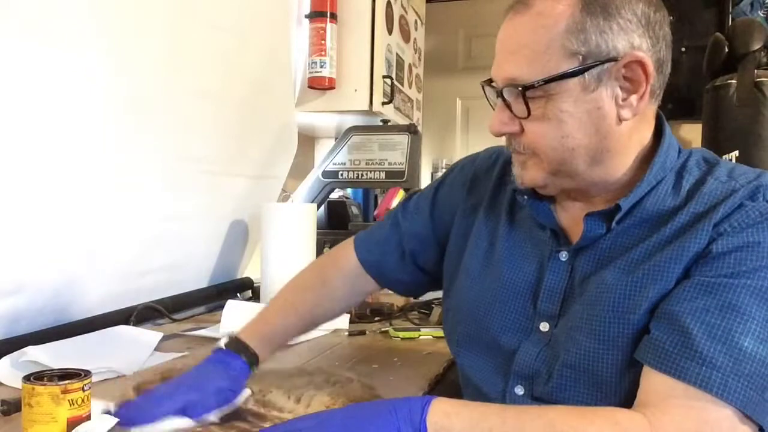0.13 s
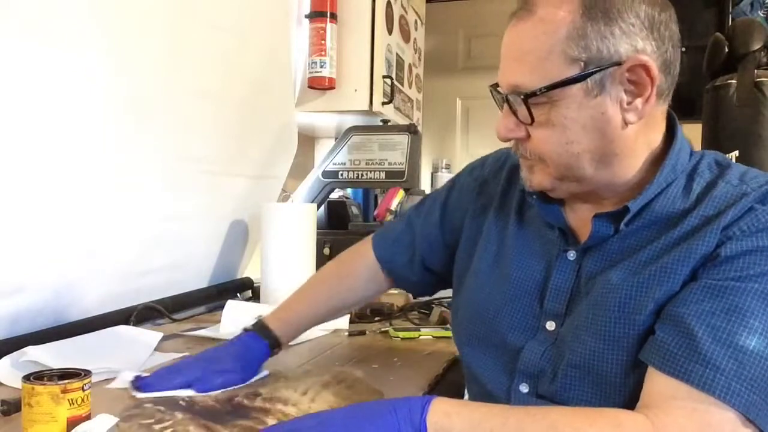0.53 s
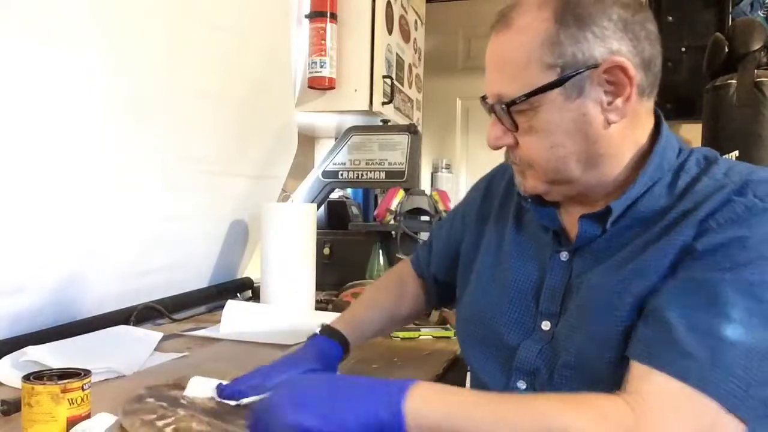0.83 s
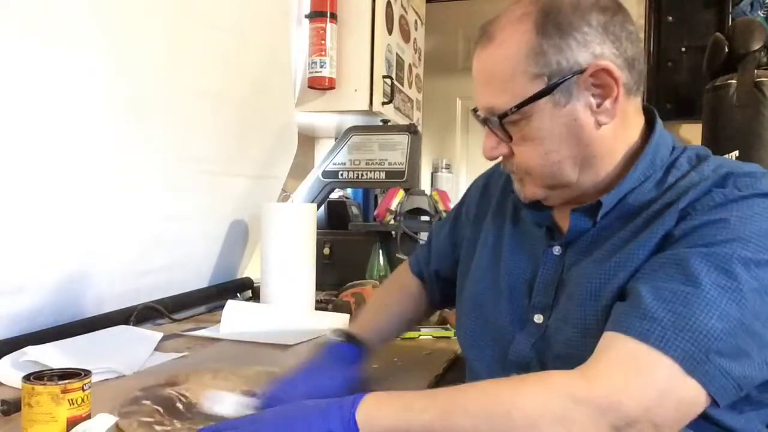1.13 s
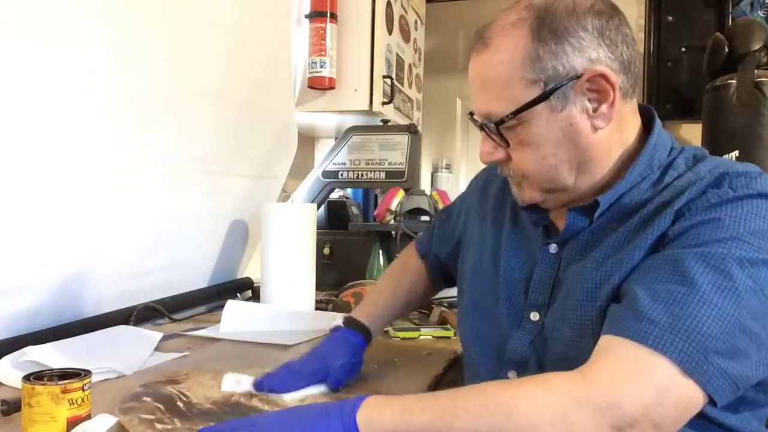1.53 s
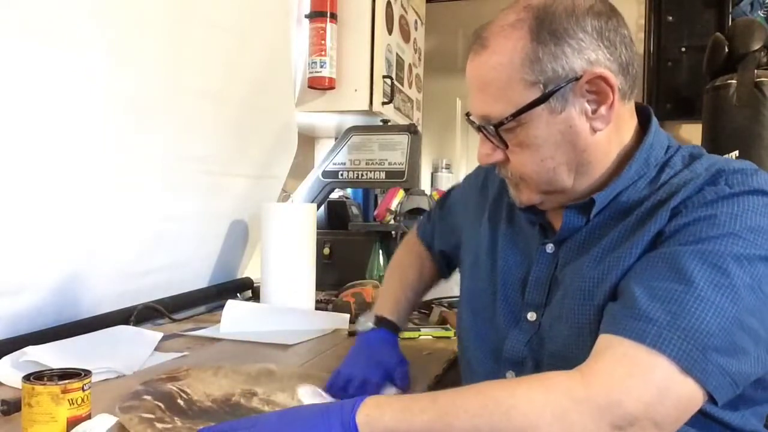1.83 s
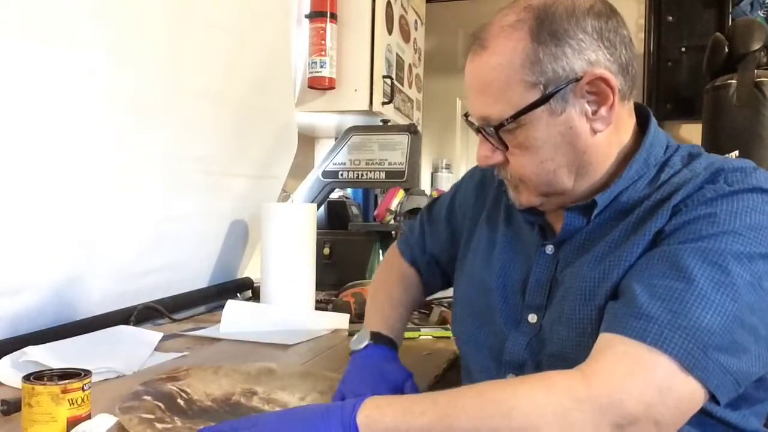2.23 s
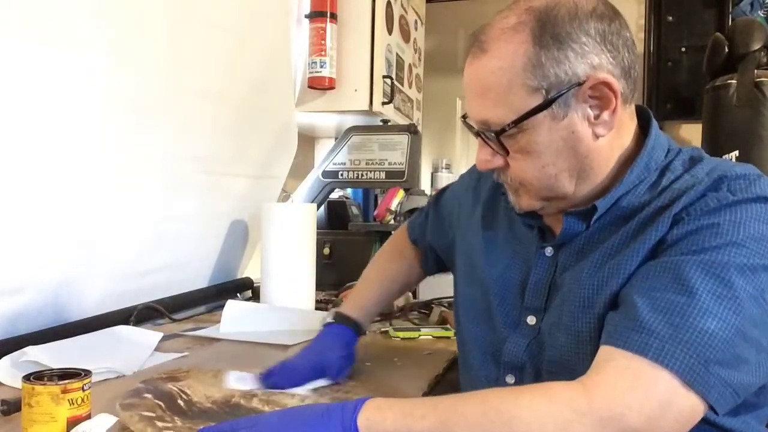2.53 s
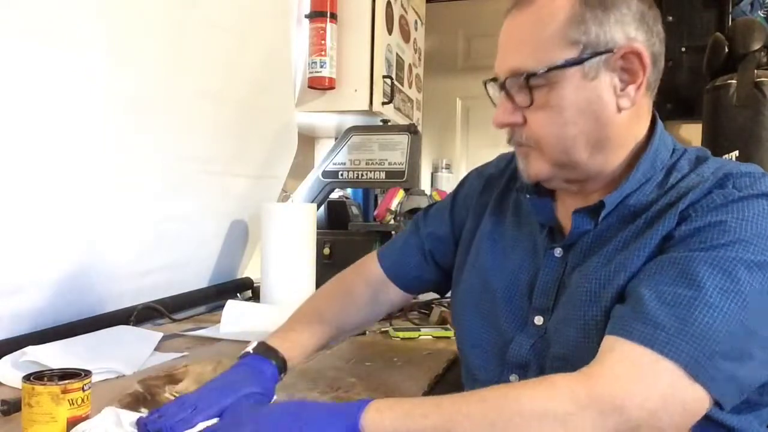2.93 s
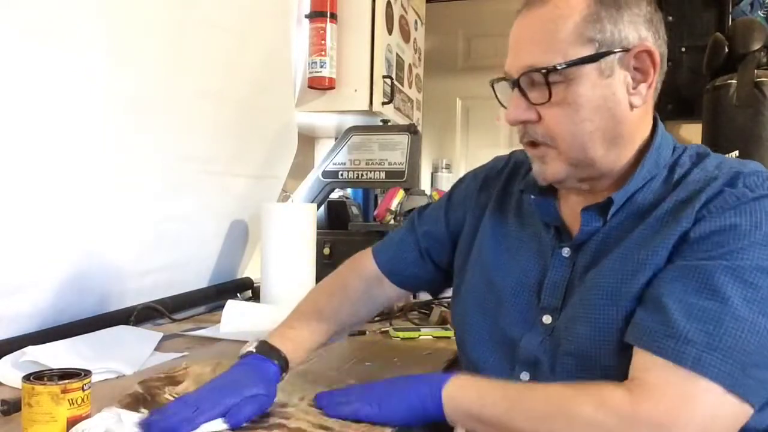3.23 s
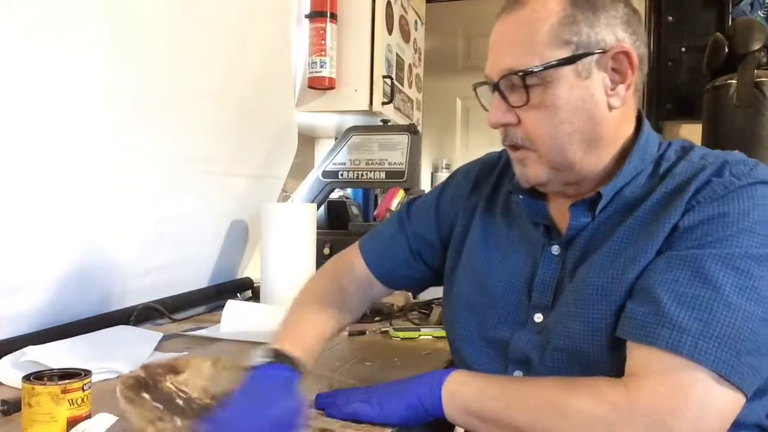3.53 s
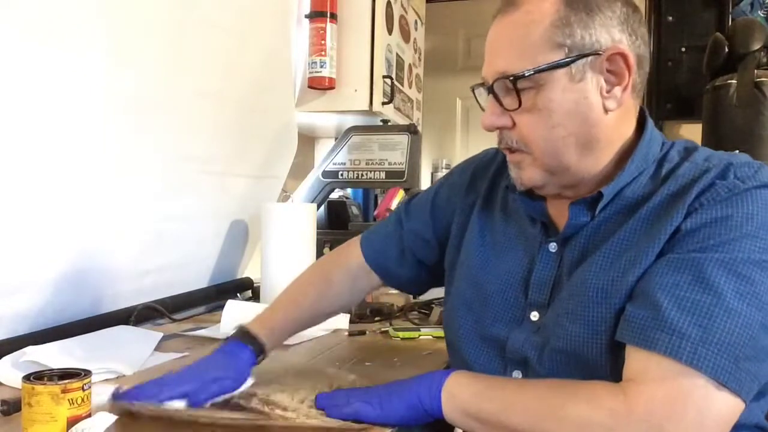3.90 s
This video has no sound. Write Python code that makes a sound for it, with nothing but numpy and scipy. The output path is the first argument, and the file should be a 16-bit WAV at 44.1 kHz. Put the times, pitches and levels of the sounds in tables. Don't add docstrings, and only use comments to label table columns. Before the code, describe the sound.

Dry papery wiping hisses over a dull drum-like skin, briefly humming, pausing and resuming, then crunching in a cluster of sharp snaps.

```python
import sys
import numpy as np
from scipy import signal
from scipy.fft import rfft, irfft
from scipy.io import wavfile

SR = 44100
rng = np.random.default_rng(int(sys.argv[2]) if len(sys.argv) > 2 else 0)


def transcribe(u):
    v = np.clip(np.atleast_2d(u).T, -1, 1)
    q = np.round(v * 32767).astype(np.int16)
    wavfile.write(sys.argv[1], SR, q)


def natural_amplitude(level_db):
    exponent = np.asarray(level_db, float) / 20
    return 10 ** exponent


N = 179134

# frequency in Hz, bandwidth in Hz, level in dB.
SKIN_MODES = [(210, 34, -7.5), (303, 320, -1.5), (474.5, 51, 3), (595, 240, 0.5), (677, 22, 1.5),
              (850, 130, -24)]


def evened(x):
    return x / np.sqrt(np.mean(x ** 2) + 1e-20)


def filtered(x, points):
    f, db = np.transpose(points)
    hz = np.fft.rfftfreq(x.shape[-1], 1 / SR)
    gain_db = np.interp(np.log(hz + 1), np.log(f), db, left=-80)
    return irfft(rfft(x) * natural_amplitude(gain_db), x.shape[-1])


def coloured(x, points):
    return evened(filtered(x, points))


def resonate(x, hz, width):
    r = np.exp(-np.pi * width / SR)
    return signal.lfilter([1 - r, 0, r - 1], [1, -2 * r * np.cos(2 * np.pi * hz / SR), r * r], x)


def skin(x, modes):
    return sum(natural_amplitude(db) * resonate(x, hz, width) for hz, width, db in modes)


def drift(hz):
    return evened(signal.lfilter(*signal.butter(2, hz, fs=SR), rng.standard_normal(N)))


def add(mix, s, sound):
    part = mix[round(s * SR):][:len(sound)]
    part += sound[:len(part)]


def slips(spread_db, judder_db):
    slips_per_s = 10000
    size = natural_amplitude(spread_db * np.minimum(rng.exponential(1, N), 6)) * rng.standard_normal(N)
    clicks = evened(size * (rng.random(N) < slips_per_s / SR))
    return (0.5 * clicks + rng.standard_normal(N)) * natural_amplitude(judder_db)


def shed():
    # frequency in Hz, level in dB.
    hum_curve = [(12, -19), (22, 6.5), (35, -0.5), (60, -8), (85, -9.5), (200, -13.5), (300, -13),
                 (600, -35)]
    # time in seconds, level in dB.
    leans = [
        (0.27, -70),
        (0.95, -59),
        (1.65, -86),
        (2.16, -86),
        (2.35, -84),
        (3.15, -57.5),
        (3.33, -62),
    ]
    lean_s = 0.036
    t = np.arange(N) / SR
    leaning = sum(natural_amplitude(db) * np.exp(-((t - s) / lean_s) ** 2) for s, db in leans)
    rumble = natural_amplitude(-70 + 2.5 * drift(2))
    return (rumble + leaning) * coloured(rng.standard_normal(N), hum_curve)


def bumps():
    # time in seconds, peak in dB, frequency in Hz.
    landings = [
        (0.272, -56, 132),
        (0.588, -58, 202),
        (0.934, -43, 192),
        (0.935, -46, 425),
        (2.018, -55, 205),
        (3.121, -49, 230),
        (3.124, -49, 420),
        (3.563, -53, 183),
        (3.98, -50, 230),
        (3.989, -45, 520),
    ]
    out, t = np.zeros(N), np.arange(6000) / SR
    for s, db, hz in landings:
        envelope = natural_amplitude(db - 60 * t / 0.082) * (1 - np.exp(-t / 0.0029))
        add(out, s, envelope * np.sin(2 * np.pi * hz * t))
    return out


def singing():
    from_s, to_s, edge_s, tightest_s = 0.012, 0.824, 0.05, 0.47
    top_hz, sag_hz_per_s, waver_hz, flutter_hz = 708, 110, 14.4, 58
    level_db, fade_db_per_s, beads_db = -61.5, 7, 4
    t = np.arange(N) / SR
    free = np.clip(np.minimum(t - from_s, to_s - t) / edge_s, 0, 1)
    slack_s = abs(t - tightest_s)
    pitch = top_hz - sag_hz_per_s * slack_s + waver_hz * drift(14.4)
    turn = np.exp(2j * np.pi * np.cumsum(pitch) / SR)
    drive = slips(spread_db=9.0, judder_db=1.5 * drift(38))
    flutter = signal.lfilter(*signal.butter(2, flutter_hz, fs=SR), drive / turn)
    ring = 0.98 + flutter / np.std(flutter)
    level = natural_amplitude(level_db - fade_db_per_s * slack_s + beads_db * drift(37))
    return free * level * evened((ring * turn).real)


def snap(peak_db, hz, low_db, noise):
    t = np.arange(len(noise)) / SR
    low_hz = 0.37 * hz
    crumple = noise * np.exp(-t / 0.0019) * (1 - np.exp(-t / 0.000072))
    burst = crumple - 4.9 * signal.unit_impulse(len(t))
    burst = signal.lfilter(*signal.butter(2, [300, 11000], "band", fs=SR), burst)
    tick = resonate(burst, 6.7 * hz, 3.3 * hz) * np.exp(-t / 0.0021)
    high = resonate(resonate(burst, hz, 0.6 * hz), hz, 0.85 * hz)
    low = resonate(burst, low_hz, 1.08 * low_hz)
    parts = [tick, high, low, skin(burst, SKIN_MODES)]
    tick, high, low, thud = (p / abs(p).max() for p in parts)
    return natural_amplitude(peak_db) * (0.29 * tick + high + natural_amplitude(low_db + 3.0) * (low + 0.38 * thud))


def creases():
    # time in seconds, peak in dB, pitch in Hz, share of the lower fold in dB.
    snap_events = [(0.151, -30, 3000, -9.5), (0.229, -32, 3800, -4), (0.27, -41, 2000, 1),
                   (0.315, -30.5, 2580, -18), (0.448, -38, 3100, 0), (0.588, -32, 1900, -9),
                   (0.927, -38.5, 3970, -1), (0.932, -32, 4100, -5), (0.9345, -23, 3800, -4.5),
                   (0.939, -27, 3200, -13), (0.946, -28, 2100, -16), (1.354, -32, 4600, -8),
                   (1.538, -35, 3800, -6), (2.018, -32.5, 4900, -8), (2.625, -33.5, 4650, -4.5),
                   (2.714, -33.5, 2750, -4.5), (2.724, -30.5, 2960, -5), (2.853, -26.5, 2610, -8.5),
                   (2.952, -44.5, 2270, 2), (3.122, -46.5, 3660, 5), (3.228, -37, 2860, -4),
                   (3.578, -37, 1650, -5), (3.686, -29, 4500, -15), (3.7463, -23, 3400, -19),
                   (3.774, -28, 2300, -10), (3.9925, -24.5, 1350, -15), (3.9778, -20.5, 3760, -21),
                   (3.9895, -29, 2000, 0.5), (4.013, -25, 1800, -44), (4.03, -25, 3380, -12)]
    out, noise = np.zeros(N), rng.standard_normal((len(snap_events), 3000))
    for (s, *how), row in zip(snap_events, noise):
        add(out, s, snap(*how, row))
    t = np.arange(8000) / SR
    room = rng.standard_normal(8000) * natural_amplitude(-60 * t / 0.31) * (1 - np.exp(-t / 0.0013))
    room = natural_amplitude(-7) * room / np.linalg.norm(room)
    room[round(0.011 * SR)] += 0.3
    return out + signal.oaconvolve(out, room)[:N]


def reversals(t):
    # time in seconds, loss of speed in dB, time to pick up in seconds.
    hand_turns = [
        (1.4, -4.5, 0.42),
        (1.63, -2.5, 0.053),
        (1.873, -7.5, 0.073),
        (2.123, -8, 0.11),
        (3.346, -8, 0.039),
    ]
    brake_s = 0.018
    return sum(db * np.exp(np.where(t < s, (t - s) / brake_s, (s - t) / pick_up))
               for s, db, pick_up in hand_turns)


def crumples(t):
    # start in seconds, dying time in seconds, strength in dB, weight on the skin in dB,
    # skin ring in dB.
    crush_events = [(0.0, 0.074, -63, 2.5, 4.5), (0.255, 0.011, -55, 10, -16),
                    (0.432, 0.027, -60, 11.5, -11), (0.91, .03, -57.5, 0, -6.0),
                    (0.924, 0.039, -48, 4.5, -6.5), (1.148, 0.034, -58, 8.5, -16),
                    (2.708, 0.026, -50, 2.5, -1.5), (2.745, 0.084, -60, -10.5, 8),
                    (3.102, 0.033, -65.5, 0, -6.0), (3.118, 0.022, -51.5, 0.5, 2.5),
                    (3.58, 0.028, -60, 5, 1), (3.673, 0.033, -46.5, -2.5, -3.5),
                    (3.743, 0.016, -41, -3, -9.0), (3.935, 0.092, -46, -2.5, -10.5),
                    (3.987, 0.074, -42.5, -1.5, -19)]
    rise_s = 0.0055
    crush, weight, thud = np.zeros((3, N))
    for s, dying, db, weight_db, ring_db in crush_events:
        late = np.maximum(t - s, 0)
        shape = natural_amplitude(db) * (1 - np.exp(-late / rise_s)) * np.exp(-late / dying) * 2
        crush = np.hypot(crush, shape)
        weight = np.hypot(weight, natural_amplitude(weight_db) * shape)
        thud = np.hypot(thud, natural_amplitude(weight_db + ring_db) * shape)
    return crush, weight, thud


def rub():
    # time in seconds, sliding strength in dB, bunching of the towel from 0 to 1.
    hand_path = [(0.0, -44, 0.09), (0.21, -46.5, 0), (0.3, -50.5, 0.69), (0.52, -52.5, 0.31),
                 (0.56, -49, 0.2), (0.68, -52, 0.65), (0.74, -59, 0.68), (0.908, -63.5, 0.72),
                 (1.01, -49, 0.19), (1.83, -44, 0), (2.45, -47, 0.08), (2.82, -49, .05), (2.93, -61, .9),
                 (3.1, -77, 0.94), (3.18, -47.5, 0.16), (3.6, -47.5, 0), (3.9, -45, 0.3),
                 (4.06, -46.5, 0.6)]
    # frequency in Hz, level in dB.
    fibre_curve = [(1500, -37), (2800, -6), (3800, -1.5), (4800, -1), (6000, -6), (7500, -15.5),
                   (10000, -39.5)]
    sheen_curve = [(5500, -5.5), (7500, -3.5), (10000, -2.5), (13000, -9), (15800, -6)]
    drag_curve = [(500, -48), (900, -4.5), (1300, -4), (2000, -3), (2800, -1.5), (4500, -24)]
    # frequency in Hz, bandwidth in Hz, level in dB.
    upper_modes = [(1084, 52, -4.5), (1200, 40, -5), (1380, 21, -6), (1547, 21, 3), (1775, 81, -2),
                   (1991, 17, 9), (2095, 45, -4), (2205, 65, 5.5)]
    t = np.arange(N) / SR
    s, db, bunch = np.transpose(hand_path)
    slide_db = np.interp(t, s, db)
    bunch = np.clip(np.interp(t, s, bunch), 0, 1)
    turn_db = reversals(t)
    crush, weight, thud = crumples(t)
    hiss = np.hypot(natural_amplitude(slide_db + turn_db), crush)
    sheen = np.hypot(natural_amplitude(slide_db + 1.44 * turn_db - 3.5 - 13.5 * bunch), natural_amplitude(-36) * crush)
    drag = np.hypot(natural_amplitude(slide_db + 0.7 * turn_db - 8 + 9.5 * bunch), weight)
    ring = np.hypot(natural_amplitude(slide_db + turn_db - 15.5 + 14 * bunch), thud)
    judder = drift(11.3)
    fine = slips(spread_db=-9.0, judder_db=0.5 * judder + 0.074 * drift(100))
    coarse = slips(spread_db=4.5, judder_db=1.74 * judder + 0.27 * drift(79))
    paper = hiss * coloured(fine, fibre_curve) + sheen * coloured(fine, sheen_curve)
    body = evened(coloured(coarse, drag_curve) + 0.19 * evened(skin(coarse, upper_modes)))
    return paper + drag * body + ring * evened(skin(coarse, SKIN_MODES))


def scene():
    return np.tile(shed() + bumps() + singing() + creases() + rub(), (2, 1))


def microphone(dry):
    # frequency in Hz, level in dB.
    response_curve = [(20, 4), (9000, -1), (11500, -2), (12400, -6.5), (13300, -9), (14100, -9),
                      (14900, -5.5), (15700, -4)]
    noise_curve = [(150, -28), (300, 2), (1300, -10), (2500, -11), (11000, -12), (15800, -13)]
    return filtered(dry, response_curve) + natural_amplitude(-76.5) * coloured(rng.standard_normal(N), noise_curve)


def top_cut(x):
    return signal.sosfilt(signal.butter(12, 16930, fs=SR, output="sos"), x)


def record(dry):
    mix = microphone(dry)
    return top_cut(mix)


dry = scene()
out = record(dry)
transcribe(out)
```